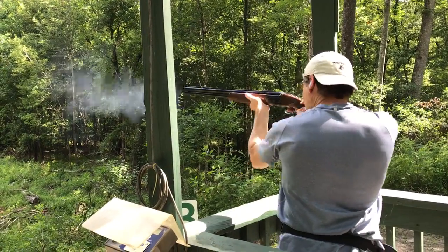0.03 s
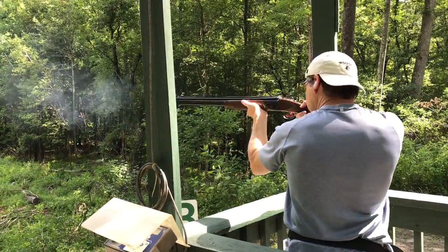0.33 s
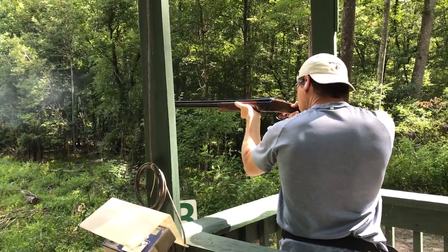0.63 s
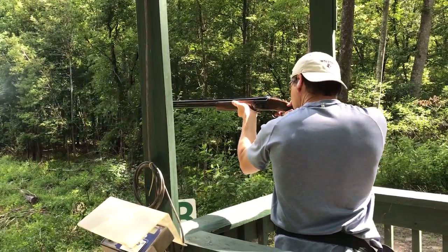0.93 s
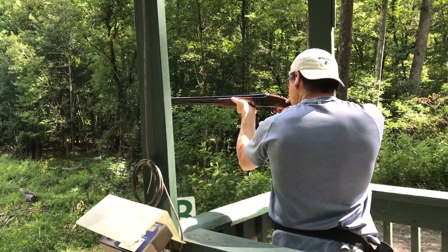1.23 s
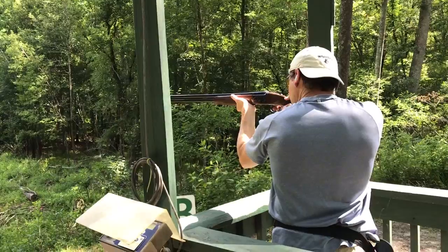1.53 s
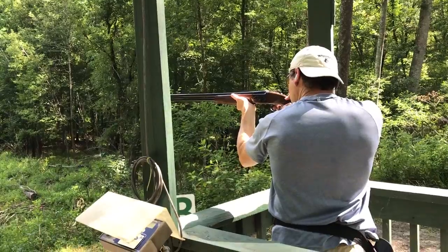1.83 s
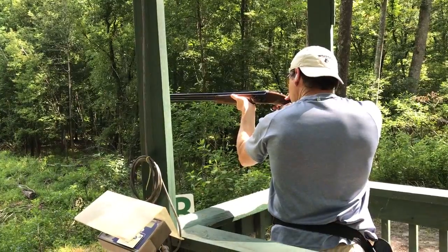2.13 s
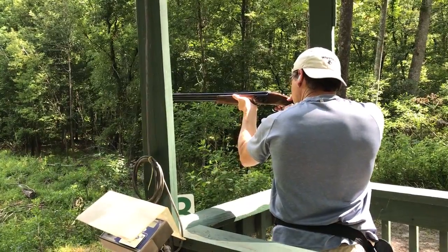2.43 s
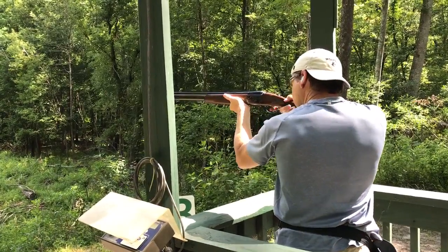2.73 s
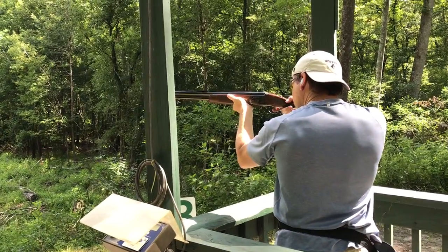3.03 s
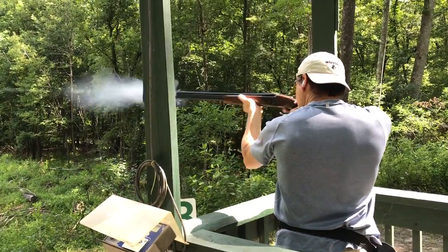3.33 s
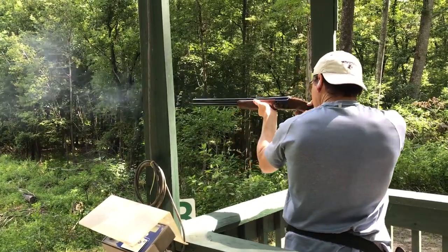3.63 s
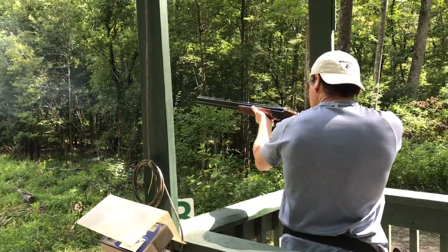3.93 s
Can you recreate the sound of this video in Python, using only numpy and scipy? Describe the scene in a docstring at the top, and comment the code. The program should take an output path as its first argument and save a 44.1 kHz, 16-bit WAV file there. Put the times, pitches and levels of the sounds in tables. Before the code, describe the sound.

Two loud, close shotgun blasts ring out at a forest's edge, one right away and one near the end. The trees throw back a long fading echo after each, while insects hiss softly above a faint distant rumble.

```python
"""A sharp bang and a long, dulling roll: a shotgun fires twice from a roofed wooden stand by a wood.
Each shot opens with a choked crack and a honk, then bursts into a blast that makes the stand ring.
Leaves, trunks and the far woods throw it back, and the air takes more treble from the later echoes.
Cicadas and a katydid (a bush cricket) sing throughout, over a faint, far rumble.
An automatic volume control turns everything down at each shot, then creeps back up."""
import sys
import numpy as np
from scipy import signal
from scipy.fft import rfft, irfft
from scipy.io import wavfile

SR = 44100
rng = np.random.default_rng(int(sys.argv[2]) if len(sys.argv) > 2 else 0)


def file_out(sig):
    """Save sig as 16-bit WAV at sys.argv[1]."""
    # one column per channel
    cols = np.atleast_2d(sig).T
    # limit, then scale
    lim = np.clip(cols, -1, 1)
    pcm = np.round(lim * 32767).astype(np.int16)
    wavfile.write(sys.argv[1], SR, pcm)


N = 176400  # 4 s


# the shots: (start t/s, blast level/dB, leaf hiss level/dB, echo level/dB)
SHOTS = [(0.054, 0.5, 0.5, -0.5), (3.4291, -1.9, 2.1, 1)]
def shots():
    """Both shots leave from the same spot, so they share one pattern of echoes."""
    blast = muzzle_blast() + stand_bounces()
    hiss = leaf_hiss()
    echoes = woods_echo() + sharp_echoes()
    out = np.zeros(N)
    for number, (start_s, blast_db, hiss_db, echo_db) in enumerate(SHOTS):
        shot = honk(number) + from_db(blast_db) * blast
        shot += from_db(hiss_db) * hiss + from_db(echo_db) * echoes
        start = int(start_s * SR)
        out[start:] += shot[:N - start]
    return out


# tone colour (how strong each pitch is) of the thin crack and of the blast: (f/Hz, level/dB)
CRACK_COLOUR = [(60, -11.5), (200, -3), (700, 3), (1500, -5.5), (3500, -11), (7000, -14), (17000, -24)]
BLAST_COLOUR = [(30, -4.5), (60, -10), (115, 7.5), (175, -1.5), (240, 7), (330, -23), (480, -11),
                (900, -1.5), (1500, -1), (2500, -3), (4000, -4.5), (8000, -12), (17000, -15.5)]
# tones of the low thump under the roof, and of the shaken stand: (f/Hz, level/dB)
THUMP_TONES = [(57, 5), (107, -1), (146, -3)]
STAND_TONES = [(240, -4.5), (397, -15), (553, -4), (697, -15), (932, -5.5), (1007, -7.5), (1122, -0.5),
               (1236, -2), (1390, -10.5), (1542, -4.5), (1852, -9.5), (2234, -15), (2621, -11.5),
               (3057, -13.5)]
def muzzle_blast():
    """A thin crack, then the blast, which thumps under the roof and sets the stand ringing."""
    t = seconds()
    onset = dict(start_s=.0195, rise_s=.0014)
    crack = from_db(-24.5) * noise(CRACK_COLOUR) * burst(0, rise_s=.001, hold_s=.005, fall_db_per_s=299.5)
    blast = from_db(10.5) * noise(BLAST_COLOUR) * burst(**onset, hold_s=.024, fall_db_per_s=519.5)
    thump = sum(from_db(db) * np.sin(2 * np.pi * hz * t) for hz, db in THUMP_TONES)
    thump *= swell(peak_s=.044, width_s=.017)
    ring = sum(from_db(db) * np.sin(2 * np.pi * (hz * t + rng.random())) for hz, db in STAND_TONES)
    return crack + blast + (thump + ring) * burst(**onset, hold_s=.031, fall_db_per_s=334)


# tones of the honk just before the blast: (f/Hz, first shot level/dB, second shot level/dB)
HONK_TONES = [(349, -13.5, -22.5), (717, -27, -12.5), (977, -12.5, -17.5), (2080, -16, -35),
              (2900, -24.5, -22)]
def honk(shot_number):
    """Wavering tones swell for a moment as the pressure wave overwhelms the microphone."""
    tones = 0
    for hz, *levels_db in HONK_TONES:
        wavering_hz = hz + 59.4 * drift(300)
        tones += from_db(levels_db[shot_number]) * sine(wavering_hz)
    return np.sqrt(2) * tones * swell(peak_s=.017, width_s=.0052)


# bounces off the stand: (delay t/s, level/dB)
BOUNCES = [(0.0241, 8.5), (0.043, 9.5), (0.052, 8.5), (.0655, 2), (0.077, 5)]
# their dull colour: (f/Hz, level/dB)
BOUNCE_COLOUR = [(50, -10), (150, -0.5), (350, 2.5), (900, 4), (1600, -5), (3000, -14.5), (8000, -31),
                 (17000, -36)]
def stand_bounces():
    """The roof, floor and walls throw the blast back in a few quick, dull bursts."""
    return noise(BOUNCE_COLOUR) * sum(from_db(db) * swell(delay, width_s=.0027) for delay, db in BOUNCES)


# colour of the sound scattered by leaves: (f/Hz, level/dB)
LEAF_COLOUR = [(50, -6.5), (150, -3), (300, 0), (600, 3), (1500, 4.5), (2800, 2.5), (4000, 1.5),
               (6500, -2.5), (10000, -8), (17000, -14)]
def leaf_hiss():
    """Nearby leaves throw the blast back as a short, bright hiss."""
    return from_db(7) * noise(LEAF_COLOUR) * burst(.024, rise_s=.013, hold_s=.039, fall_db_per_s=168.5)


# single echoes: (delay t/s, peak level/dB, half-width t/ms)
SHARP_ECHOES = [(.049, 14, 0.36), (0.0645, 14, 0.1), (.0722, 12, 0.15), (.0752, 15, 0.38),
                (.0769, 15.5, 0.4), (.2515, -0.5, 0.11), (0.2869, 9, 0.26), (.3565, 3, 0.3),
                (0.3674, -1, .35), (0.3936, 3, 0.34), (0.4072, -3, 0.39), (0.762, -6, 0.28),
                (.842, -8.5, 0.38), (.852, -13, 0.48), (.933, -12, .4), (.965, -21, 0.49)]
def sharp_echoes():
    """Posts, ground and trunks each return one click, a quick down-and-up swing of air pressure."""
    out = np.zeros(N)
    for delay, db, width_ms in SHARP_ECHOES:
        width = width_ms / 1000
        swing = (seconds() - delay) / width * swell(delay, width)
        out += from_db(db) * np.exp(.5) * swing  # exp(.5) brings the swing's peak to 1
    return out


# strength of the rolling echo: (delay t/s, level/dB)
WOODS_LEVEL = [(.08, 0), (.2, -7), (.25, 1), (.31, 1.5), (.39, 0.5), (.44, -0.5), (.47, -3), (.6, -5.5),
               (.82, -7.5), (1.0, -10.5), (1.3, -18.5), (1.601, -23), (1.95, -25), (2.35, -28.5),
               (2.801, -31.5), (3.4, -46)]
# its colour before the air dulls it: (f/Hz, level/dB)
WOODS_COLOUR = [(40, -19), (100, -14.5), (170, -12), (250, 1.5), (360, 2.5), (480, 0), (700, 1),
                (1100, -5.5), (1700, -4.5), (3200, -8), (6400, -8), (12000, -13.5), (17000, -20.5)]
def woods_echo():
    """Countless trunks each return a small pulse; the longer the path, the more treble the air takes."""
    t, octave = seconds(), np.log2(freqs())
    sizes = rng.standard_normal(N) * from_db(drift(250))
    pulses_per_s = 14000 * (1 + t)
    arrivals = rng.random(N) < pulses_per_s / SR
    spectrum = rfft(coloured(sizes * arrivals, WOODS_COLOUR))
    bands_hz, roll = np.geomspace(40, 18000, 18), 0
    for hz, this_band in zip(bands_hz, np.eye(len(bands_hz))):
        band = irfft(spectrum * np.interp(octave, np.log2(bands_hz), this_band), N)
        air_loss_db_per_s = 11 * (hz / 1000) ** .65
        roll += band * from_db(-air_loss_db_per_s * t)
    delays, db = np.transpose(WOODS_LEVEL)
    fade_in = np.minimum(t / delays[0], 1) ** 2
    return roll * from_db(np.interp(t, delays, db)) * fade_in


# colours of the katydid's buzz and ticks: (f/Hz, level/dB)
BUZZ_COLOUR = [(8000, -33.5), (10400, -20.5), (11500, -7), (12300, -9.5), (12700, 0.5), (13200, -7),
               (14600, -3.5), (15800, -12.5), (17500, -12)]
TICK_COLOUR = [(7000, -25), (10500, -12), (13000, -1), (17000, -2)]
# strength of the buzz over time, and of each tick: (t/s, level/dB)
BUZZ_LEVEL = [(0, -49), (.6, -43.5), (1.2, -49.5), (1.7, -50), (2.1, -49.5), (2.7, -51.5), (3.3, -50.5),
              (4, -46)]
TICKS = [(.819, -43), (.896, -37), (.960, -41), (1.033, -37), (1.102, -40), (3.038, -50.5), (3.111, -47),
         (3.178, -43), (3.248, -43)]
def katydid():
    """A high buzz pulsed by the wing strokes, and short runs of single ticks."""
    wingbeat_hz = 46 + .6 * drift(4)
    strokes = 1 + .28 * sine(wingbeat_hz)
    buzz_db = np.interp(seconds(), *np.transpose(BUZZ_LEVEL))
    buzz = noise(BUZZ_COLOUR) * strokes * from_db(buzz_db)
    ticks = noise(TICK_COLOUR) * sum(from_db(db) * swell(s, width_s=.0035) for s, db in TICKS)
    return buzz + ticks


# colour of the cicada chorus: (f/Hz, level/dB)
CICADA_COLOUR = [(1500, -42), (2300, -11.5), (3200, -2), (4200, 0.5), (5000, -2.5), (6100, 1), (7800, -4),
                 (8800, -9.5), (10300, -15.5), (17000, -20.5)]
def cicadas():
    """Many cicadas blend into one steady hiss."""
    return from_db(-50) * noise(CICADA_COLOUR)


# colour of the rumble: (f/Hz, level/dB)
RUMBLE_COLOUR = [(20, -22), (35, -11.5), (58, 1.5), (90, -2.5), (150, -11.5), (280, -4), (450, -12),
                 (700, -19), (1200, -25.5), (2200, -27.5), (10000, -28.5)]
def far_rumble():
    """A faint, steady, low noise from far away."""
    return from_db(-51) * noise(RUMBLE_COLOUR)


def from_db(db):
    """Turn decibels into a multiplier: 0 dB is 1, -6 dB about half."""
    return 10 ** (np.asarray(db) / 20)


def seconds():
    """The time of every sample."""
    return np.arange(N) / SR


def freqs():
    """The frequency of every point in a spectrum, at least 1 Hz."""
    return np.maximum(np.arange(N // 2 + 1) * SR / N, 1)


def coloured(x, colour):
    """Give a sound a tone colour, then set its average power to 1."""
    hz, db = np.transpose(colour)
    f = freqs()
    gain = from_db(np.interp(np.log(f), np.log(hz), db))
    shaped = irfft(rfft(x) * gain / (1 + (28 / f) ** 4), N)  # fades away below 28 Hz
    return shaped / np.sqrt(np.mean(shaped ** 2) + 1e-20)


def noise(colour):
    """Steady noise with the given tone colour."""
    return coloured(rng.standard_normal(N), colour)


def drift(points_per_s):
    """Glide between random values, typically about 1 away from zero."""
    points = rng.standard_normal(4000)
    return np.interp(seconds() * points_per_s, np.arange(len(points)), points)


def sine(hz):
    """A smooth wave that follows a changing frequency."""
    return np.sin(2 * np.pi * np.cumsum(hz) / SR)


def burst(start_s, rise_s, hold_s, fall_db_per_s):
    """A level that rises, holds and dies away."""
    t = seconds() - start_s
    return np.clip(t / rise_s, 0, 1) * from_db(-fall_db_per_s * np.clip(t - rise_s - hold_s, 0, 2))


def swell(peak_s, width_s):
    """A bell-shaped rise and fall."""
    return np.exp(-.5 * np.minimum(((seconds() - peak_s) / width_s) ** 2, 200))


def scene():
    """Shots over the summer wood, in one channel."""
    background = far_rumble() + cicadas()
    return (shots() + katydid() + background)[None]


def record(dry):
    """The volume drops at each blast and recovers slowly; peaks are rounded and the top treble is cut."""
    limit_db, recovery_db_per_s, ceiling, cutoff_hz = -10, 18, .8, 17300
    smoothing_s, lookahead_s = .007, .0014
    t, memory = seconds(), np.exp(-1 / (smoothing_s * SR))
    power = signal.lfilter([1 - memory], [1, -memory], dry[0] ** 2)
    excess_db = np.maximum(10 * np.log10(power + 1e-12) - limit_db, 0)
    recovery_db = recovery_db_per_s * t
    drop_db = np.maximum.accumulate(excess_db + recovery_db) - recovery_db
    turned_down = dry * from_db(-np.interp(t + lookahead_s, t, drop_db))
    rounded = turned_down / (1 + (turned_down / ceiling) ** 4) ** .25
    treble_cut = signal.ellip(10, .1, 80, cutoff_hz, fs=SR, output="sos")
    return signal.sosfilt(treble_cut, rounded)


dry = scene()
out = record(dry)
file_out(out)
```